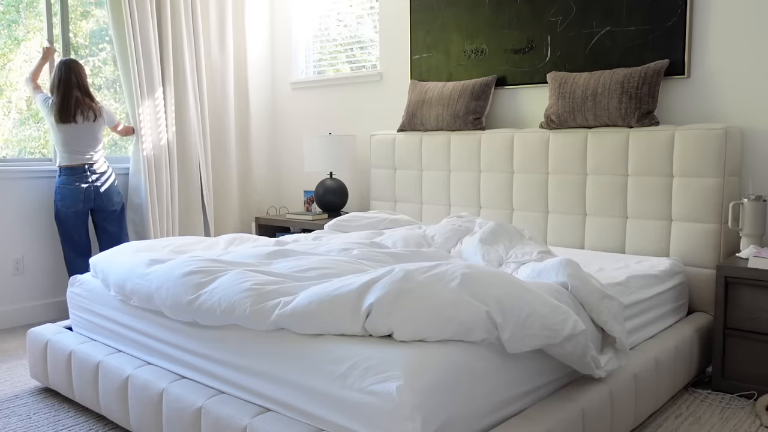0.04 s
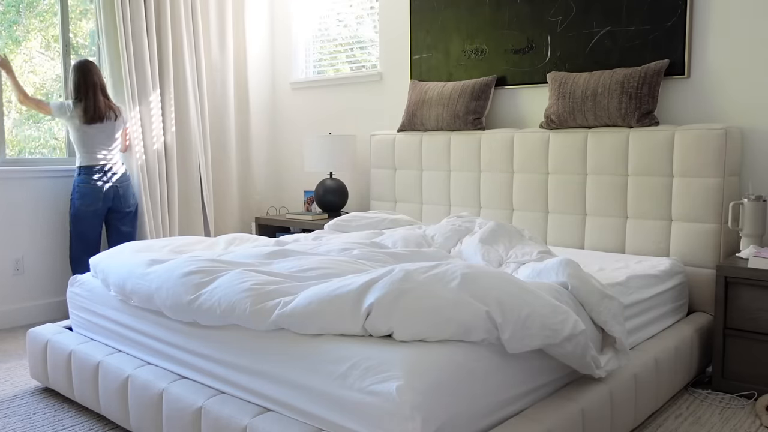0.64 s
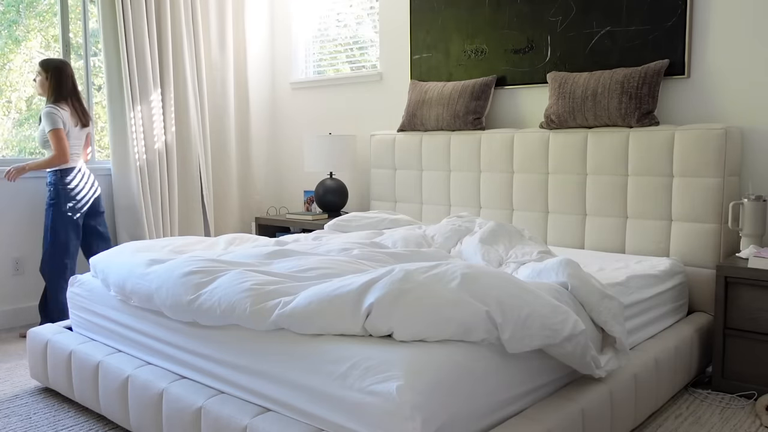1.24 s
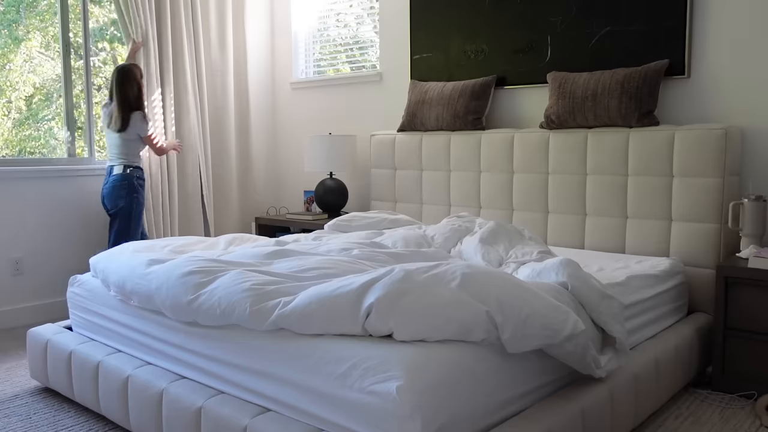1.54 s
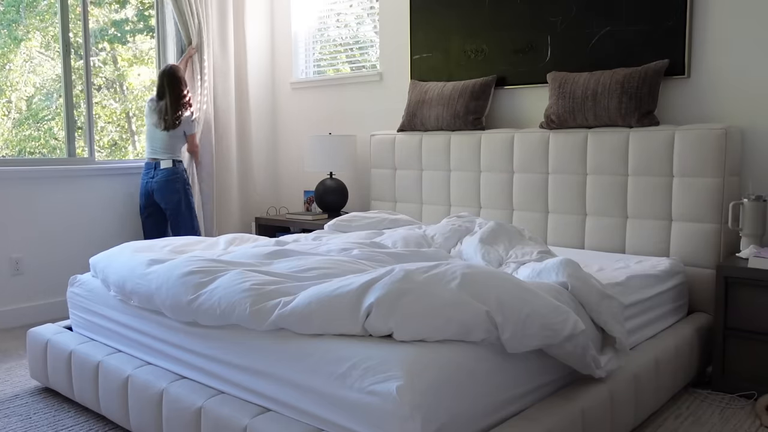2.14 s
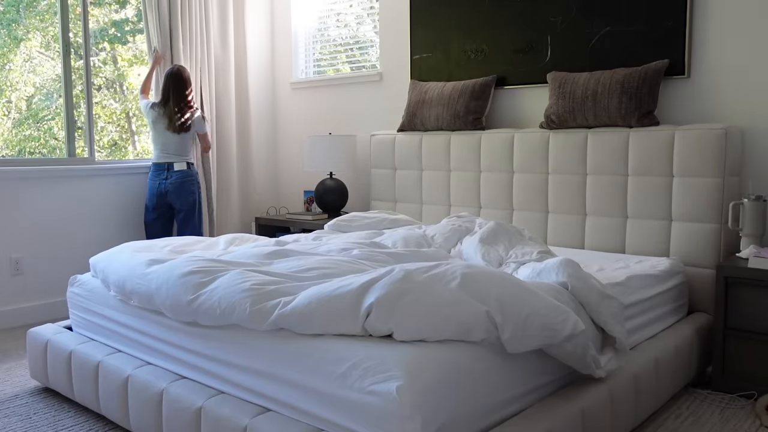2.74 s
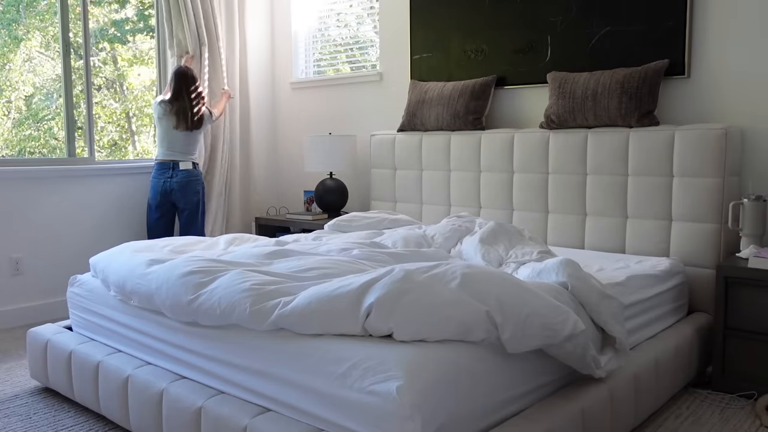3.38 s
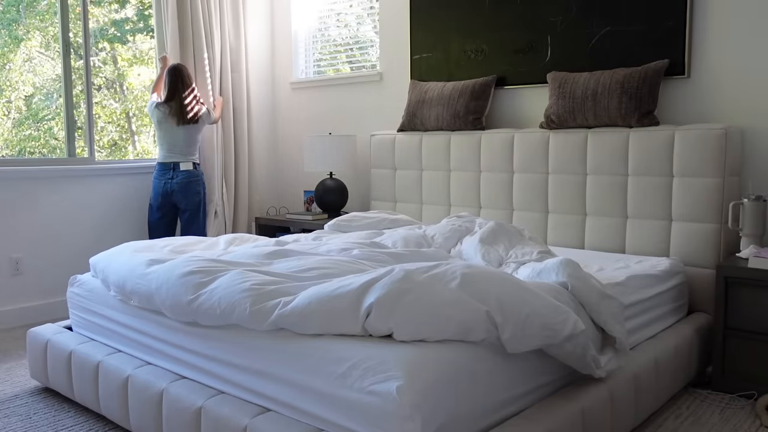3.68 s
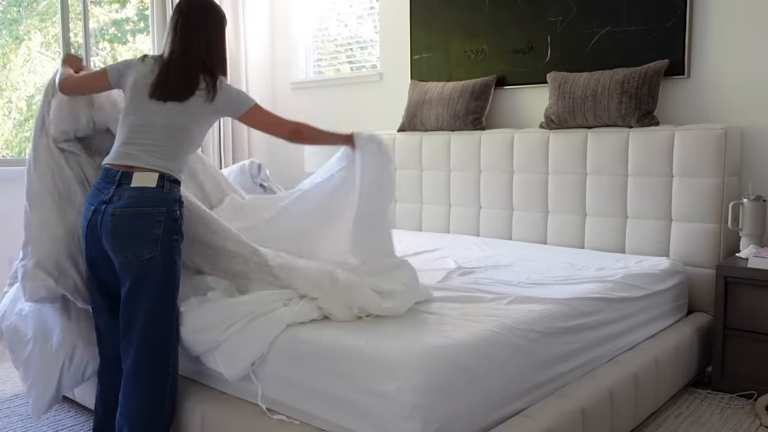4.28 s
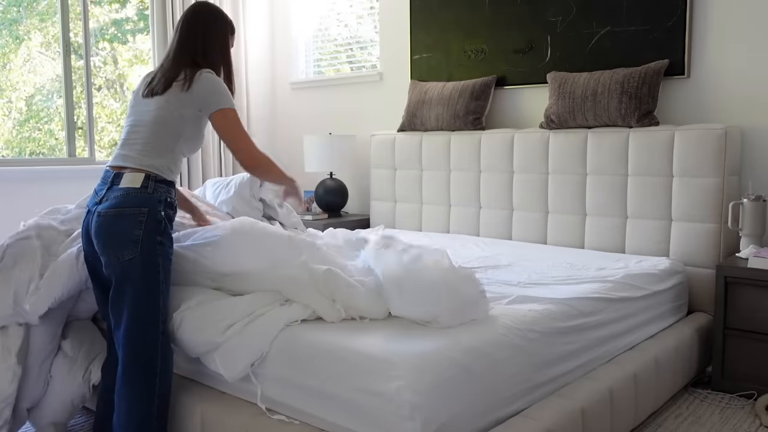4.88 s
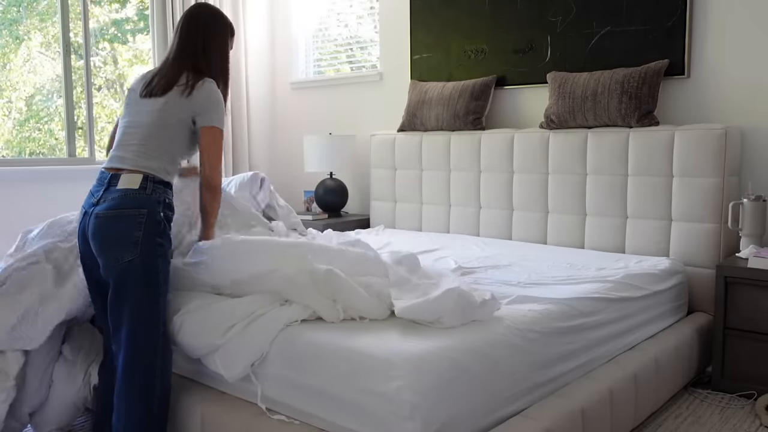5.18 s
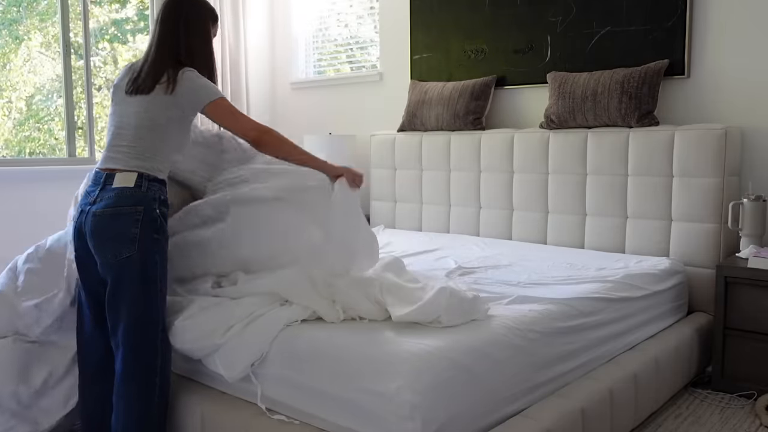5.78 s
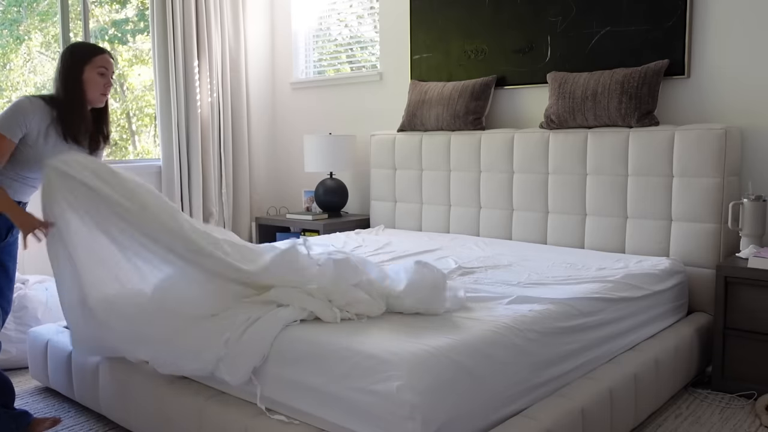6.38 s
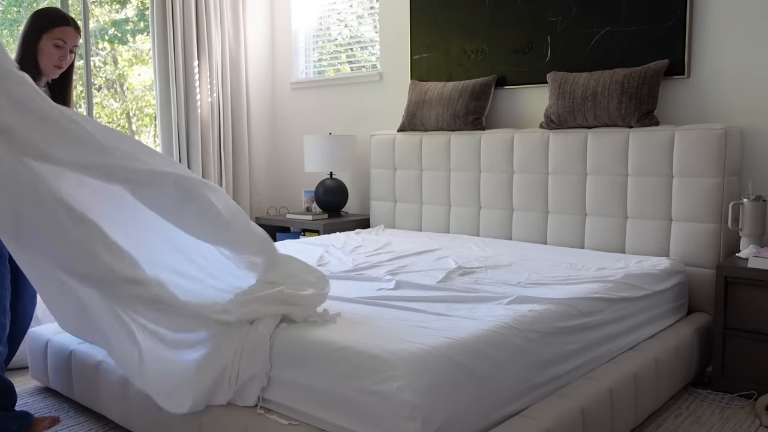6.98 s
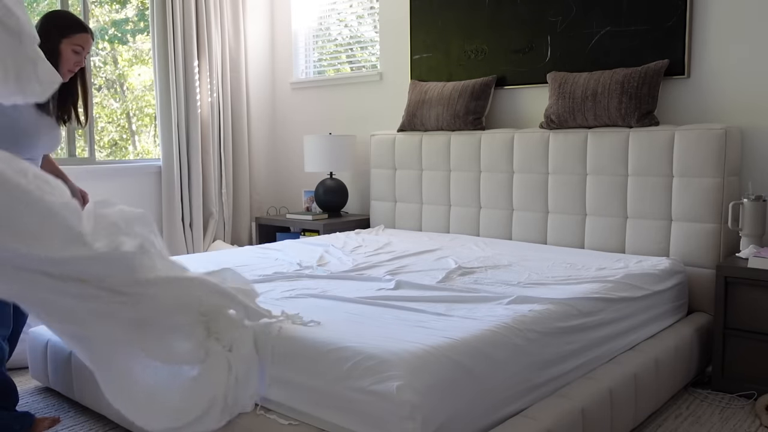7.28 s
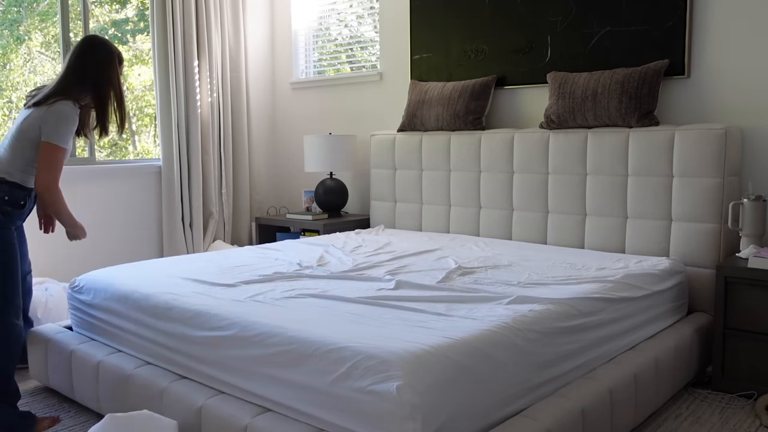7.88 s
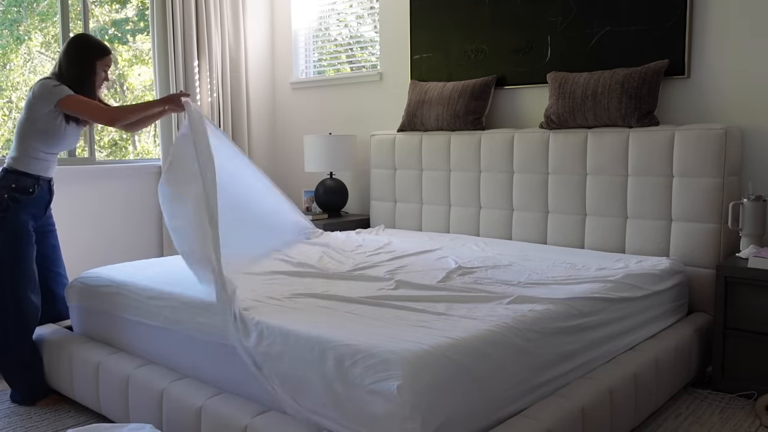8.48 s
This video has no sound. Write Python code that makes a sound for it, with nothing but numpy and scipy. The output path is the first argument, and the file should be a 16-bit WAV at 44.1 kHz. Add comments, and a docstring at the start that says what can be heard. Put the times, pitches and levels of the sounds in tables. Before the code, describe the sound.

Curtains are swished open in a quiet bedroom, followed by bedding being dragged and shaken, over a faint fan hum.

```python
"""Curtains and bedclothes

Two curtains are drawn in a quiet bedroom, their rings chattering along the rod across the room.
Nearer by, a duvet and sheets are dragged off the bed: cotton hisses as it slides, folds buckle
and flap in puffs of air, and the heap lands. A fan hums faintly throughout."""
import sys
import numpy as np
from scipy import signal
from scipy.fft import rfft, irfft, next_fast_len
from scipy.io import wavfile
from scipy.ndimage import map_coordinates

SR = 44100
rng = np.random.default_rng(int(sys.argv[2]) if len(sys.argv) > 2 else 0)


def unload_wav(signal):
    """Save mono or channel-first audio to the path in sys.argv[1] as 16-bit WAV at rate SR, clipped to [-1, 1]."""
    wavfile.write(
        sys.argv[1],
        SR,
        np.round(np.clip(np.atleast_2d(signal).T, -1, 1) * 32767).astype(np.int16),
    )


N = 376173
TIME = np.arange(N) / SR


def amp(db):
    """Decibels to gain."""
    return 10 ** (np.asarray(db) / 20)


def unit_rms(x):
    """Scales to an rms of one."""
    return x / np.sqrt(np.mean(x ** 2) + 1e-20)


def read(curve, hz):
    """Reads a curve on a log-frequency axis."""
    f, value = np.transpose(curve)
    return np.interp(np.log(hz + 1), np.log(f + 1), value)


def add(mix, s, sound):
    """Drops a sound into the mix at s seconds."""
    part = mix[round(s * SR):][:len(sound)]
    part += sound[:len(part)]


def impulse(spectrum, size=4096):
    """The minimum-phase click of unit energy with this spectral shape."""
    hz = abs(np.fft.fftfreq(size, 1 / SR))
    log_gain = np.log(amp(read(spectrum, hz)))
    click = np.fft.ifft(np.exp(np.conj(signal.hilbert(log_gain)))).real
    return click / np.linalg.norm(click)


def ringing(modes):
    """Struck resonances (f/Hz, width/Hz, energy/dB): the narrower, the longer they ring."""
    t = TIME[:SR // 2]
    out = np.zeros(len(t))
    for k, (hz, width, db) in enumerate(modes):
        gain = (-1) ** k * amp(db) * np.sqrt(4 * np.pi * width / SR)
        out += gain * np.exp(-np.pi * width * t) * np.cos(2 * np.pi * hz * t)
    return out


def through(x, response):
    """Passes a sound through a body."""
    return signal.oaconvolve(x, response)[:N]


def eq(x, curve):
    """Zero-phase EQ along a curve (f/Hz, gain/dB)."""
    size = next_fast_len(len(x) + 4096)
    gain = amp(read(curve, np.fft.rfftfreq(size, 1 / SR)))
    return irfft(rfft(x, size) * gain, size)[:len(x)]


def contacts(per_s, spread_db):
    """Random tiny impacts of uneven size and either sign, rms one."""
    size = amp(spread_db * np.minimum(rng.exponential(1, N), 4))
    return unit_rms(size * rng.choice([-1, 1], N) * (rng.random(N) < per_s / SR))


def wobble(hz, depth_db):
    """A factor that wanders around one, at roughly the given rate."""
    count = N // 64
    ratio = np.fft.rfftfreq(count, 64 / SR) / hz
    drift = unit_rms(irfft(rfft(rng.standard_normal(count)) * ratio / (1 + ratio ** 3)))
    return amp(depth_db * np.interp(TIME, np.linspace(0, TIME[-1], len(drift)), drift))


def hits(cues):
    """One impulse for each cue (t/s, level/dB)."""
    out = np.zeros(N)
    for s, db in cues:
        add(out, s, amp([db]))
    return out


def stroke(peak_s, rise_s, fall_s, db, curve=1.66):
    """One movement's swell, 10 dB down at rise_s before and fall_s after; more curve, flatter top."""
    away = np.maximum((peak_s - TIME) / rise_s, (TIME - peak_s) / fall_s)
    return amp(db - 10 * np.minimum(away ** curve, 20))


def strokes(cues):
    """Overlapping movements add in power."""
    return np.sqrt(sum(stroke(*cue) ** 2 for cue in cues))


def puff(hz):
    """Air squeezed out by a fold: a quick push and a longer suction, of unit energy."""
    phase = 2 * np.pi * hz * TIME[:2048]
    push = (1 - phase) * np.exp(-phase)
    return push / np.linalg.norm(push)


def sliding(pressure, cloth):
    """Threads catching on threads: a fine, slightly grainy hiss."""
    threads = contacts(per_s=9000, spread_db=1.5) * wobble(hz=30, depth_db=0.4)
    return through(threads * pressure, impulse(cloth))


# Stereo width of air and reflections: f/Hz, side level/dB
SIDE_EQ = [(60, -26), (150, -21), (300, -16.5), (650, -5.5), (1300, -3.5), (2400, -3.5), (4200, -4),
           (8000, -0.5), (15000, -7.5)]
def side_tone(x):
    """Colours a side signal so the lows stay centred and the highs spread."""
    return eq(x, SIDE_EQ)


# Bed of fan and room air: f/Hz, level/dB
AIR_TONE = [(25, -39.5), (60, -15.5), (120, -5), (170, -3), (245, -2), (340, -2), (450, -11.5),
            (650, -17.5), (1200, -13.5), (1850, -13), (2700, -26), (4500, -28.5), (7500, -36),
            (15500, -41.5)]
# The low notes of the hum: f/Hz, wander scale/Hz, level/dB
FAN_HUM = [(116, 3.2, -7.5), (237.8, 8.3, 1)]
def fan():
    """A steady, wide wash of air over a soft hum that wavers in pitch and level."""
    air, spread = (through(rng.standard_normal(N), impulse(AIR_TONE)) for _ in range(2))
    side = amp(5.5) * side_tone(spread)
    hum = np.zeros(N)
    for hz, wander, db in FAN_HUM:
        pitch = hz + wander * np.log(wobble(hz=17.3, depth_db=4.5))
        hum += amp(db) * np.sin(2 * np.pi * np.cumsum(pitch) / SR)
    hum *= wobble(hz=3.2, depth_db=0.5)
    return amp(-57) * np.array([air + side, air - side]) + amp(-58.5) * hum


# Warm body of the rod under the left curtain: f/Hz, level/dB
LEFT_ROD_TONE = [(35, -18), (70, -8), (150, -1.5), (270, 10), (400, -2), (600, -7), (800, -4), (1200, -8),
                 (1600, -3), (2200, 1), (2900, -8.5), (4800, -9.5), (7000, -17.5), (10000, -24.5),
                 (15000, -48)]
def left_curtain():
    """One slow, even glide: many light contacts between rings and rod."""
    chatter = contacts(per_s=2500, spread_db=1) * wobble(hz=25, depth_db=0.9)
    glide = stroke(peak_s=0.45, rise_s=0.8, fall_s=0.5, db=-47.3, curve=2.57)
    return amp(2.5) * through(chatter * glide, impulse(LEFT_ROD_TONE))


# Cloth snapping taut or landing, and footfalls: t/s, level/dB, f/Hz
FLAP_CUES = [(1.212, -19.5, 200), (1.228, -18.5, 400), (1.301, -17.5, 900), (1.738, -16, 99.2),
             (4.2976, -1, 420), (4.328, -8, 420), (4.366, -16, 600), (4.698, 9.5, 630), (4.741, -15, 450),
             (5.142, -7, 600), (5.365, -7, 110), (5.473, -8, 350), (5.506, 0.5, 700), (6.425, -7.5, 400),
             (6.725, -13.5, 700), (7.786, 6, 180), (7.818, -8, 200)]
# Muffled thump of soft cloth: f/Hz, level/dB
FLAP_TONE = [(30, -42.5), (80, -8.5), (160, 2), (240, 9), (700, -1.5), (1300, -4.5), (2000, -18.5),
             (4000, -19), (12000, -66)]
def flaps():
    """Each flap is one large puff, dulled by the cloth; the deep ones set the room booming briefly."""
    puffs = np.zeros(N)
    for s, db, hz in FLAP_CUES:
        add(puffs, s, amp(db) * puff(hz))
    thump = through(puffs, impulse(FLAP_TONE))
    boom = through(puffs, ringing([(227, 21, 0)]))
    return amp(-17) * thump + amp(-24) * boom


# Midrange voice of the creak: f/Hz, width/Hz, level/dB
CREAK_RING = [(1130, 130, 0), (1560, 100, -1)]
def creak():
    """A short run of slips excites two resonances."""
    swell = stroke(peak_s=1.381, rise_s=0.008, fall_s=0.016, db=-49)
    return through(contacts(per_s=1500, spread_db=-5) * swell, ringing(CREAK_RING))


# Weave skidding over weave: t/s, length/s, f/Hz, level/dB
SWISH_CUES = [(1.407, 0.056, 4600, -60), (4.395, 0.055, 4840, -50.5), (4.726, 0.041, 5150, -52),
              (5.008, 0.064, 4600, -55), (5.501, 0.021, 1540, -42.5), (6.09, .08, 4970, -59.5)]
def swishes():
    """Ridged weave rubs briefly at one speed: a narrow band of hiss."""
    out = np.zeros(N)
    for s, length, hz, db in SWISH_CUES:
        ridge = ringing([(hz, 0.25 * hz, 0)])
        count = round(length * SR)
        band = through(through(rng.standard_normal(count), ridge), ridge)[:count]
        add(out, s, amp(db) * unit_rms(band) * signal.windows.tukey(count, 0.3))
    return out


# Handfuls of curtain: peak t/s, rise/s, fall/s, level/dB
GATHER_CUES = [(1.416, 0.008, 0.22, -62.5), (2.2, 0.36, 0.15, -48), (2.566, 0.11, 0.134, -60),
               (2.764, 0.056, 0.089, -63), (3.275, 0.18, 0.9, -57)]
# Soft hiss of heavy drapes: f/Hz, level/dB
DRAPE_TONE = [(200, -8), (700, -2.5), (1500, -0.5), (2500, -2.5), (4800, -7), (7000, -10.5), (10000, -21),
              (15000, -30)]
def gathering():
    """Hands bunch the curtain, and the cloth rubs over itself."""
    return sliding(strokes(GATHER_CUES), DRAPE_TONE)


# The right curtain's jerks, from first catch to swing-back: peak t/s, rise/s, fall/s, level/dB
PULL_CUES = [ (1.744, 0.0073, 0.013, -29.5), (1.872, 0.096, 0.066, -19.5), (1.965, 0.084, 0.086, -16.5),
             (2.08, 0.073, 0.098, -27), (2.341, 0.02, 0.033, -55.5), (3.375, 0.049, 0.05, -28.5),
             (3.44, 0.043, 0.06, -21.5), (3.505, 0.061, 0.059, -27), (3.8, 0.16, 0.03, -49), ]
# Accents from single rings knocking on the rod: t/s, level/dB
KNOCK_CUES = [(1.739, -7.5), (1.866, 1), (1.964, -10), (1.996, 3), (2.574, -27.5), (2.755, -30),
              (3.298, -25), (3.330, -19), (3.359, -13), (3.436, 1), (3.551, -1.5), (3.678, -19.5),
              (3.804, -14.5), (3.832, -29)]
# Bright scrape of the rod under the right curtain: f/Hz, level/dB
RIGHT_ROD_TONE = [(90, -55), (250, -22.5), (370, -13), (540, -24), (750, -15), (1150, -12.5), (1800, -6),
                  (2250, 2), (2700, -0.5), (3600, -6.5), (5400, -11.5), (8000, -26), (11000, -45.5),
                  (15000, -57.5)]
# Top-end sizzle of fast rings: f/Hz, level/dB
SIZZLE_TONE = [(1000, -49.5), (3500, -3), (6000, 4.5), (8000, -4.5), (11000, -16), (15000, -39)]
# Resonances stirred by rings on the rod: f/Hz, width/Hz, level/dB
ROD_RING = [(245, 10.6, -22.5), (440, 20, -33.5), (818, 20.2, -33.5), (1292, 32, -15.5), (2040, 19, -19),
            (2100, 21.8, -16), (2200, 9.1, -7), (2217, 27.4, -33.5), (2300, 28, -21), (2490, 21, -11),
            (2430, 27, -9.5), (2780, 14, -30.5), (2700, 26, -25), (3540, 27, -16), (4460, 35, -29)]
def right_curtain():
    """Two brisk pulls: the rings scrape, brighter the faster they run, and the rod resonates."""
    speed = strokes(PULL_CUES)
    brightness = np.sqrt(speed / speed.max())
    chatter = unit_rms(contacts(per_s=2400, spread_db=2.5) + amp(-4) * rng.standard_normal(N))
    drive = chatter * speed * wobble(hz=70.5, depth_db=0.5)
    knocks = hits(KNOCK_CUES)
    scrape = through(drive + knocks, impulse(RIGHT_ROD_TONE))
    skips = contacts(per_s=3000, spread_db=3.5)
    sizzle = through(skips * speed * brightness, impulse(SIZZLE_TONE))
    rod = through(drive + amp(2) * knocks, ringing(ROD_RING))
    return amp(-0.5) * scrape + amp(-9) * sizzle + amp(-14.5) * rod


# Rings swinging together: peak t/s, rise/s, fall/s, level/dB
SWING_CUES = [(3.55, 0.14, 0.024, -43), (3.689, 0.022, 0.048, -45.5), (3.808, 0.006, 0.013, -34)]
# Their chime: f/Hz, width/Hz, level/dB
CHIME_RING = [(2210, 70, -5), (2390, 81, -5), (2440, 90, -8)]
def settling():
    """The second pull leaves the rings chiming and briefly sets a low room resonance humming."""
    taps = contacts(per_s=660, spread_db=-4) * strokes(SWING_CUES)
    taps = eq(taps, [(1200, -25), (2150, 0.5), (2550, 1), (3600, -18)])
    swell = stroke(peak_s=3.44, rise_s=0.11, fall_s=0.08, db=-45)
    room_hum = through(contacts(per_s=360, spread_db=-2.5) * swell, ringing([(239.5, 14, 0)]))
    return amp(-2) * through(taps, ringing(CHIME_RING)) + amp(1.5) * room_hum


# The duvet is gripped, thrown aside and dragged off to land; then the sheet is shaken out:
# peak t/s, rise/s, fall/s, billow level/dB, buckle level/dB, slide level/dB
TUG_CUES = [ (3.885, 0.008, 0.21, -54, -50.5, -46.5), (4.097, 0.15, 0.66, -53.5, -55, -52.5),
            (4.315, 0.037, 0.1, -39, -43.5, -59), (4.418, 0.096, 0.1, -47.5, -50, -50),
            (4.534, 0.047, 0.067, -65, -48.5, -54.5), (4.669, 0.081, 0.15, -47.5, -47.5, -52.5),
            (4.74, 0.04, 0.055, -49, -46.5, -47.5), (5.02, 0.27, 0.17, -54.5, -50.5, -54.5),
            (5.157, 0.025, 0.1, -54, -48, -56.5), (5.271, 0.1, 0.3, -47, -48.5, -53),
            (5.481, 0.072, 0.11, -41, -53, -49.5), (5.572, 0.09, 0.085, -43, -46, -48.5),
            (5.671, 0.1, 0.11, -49, -53, -50), (5.89, 0.36, 0.26, -71, -56, -59),
            (6.156, 0.19, 0.38, -49.5, -57.5, -57), (6.33, 0.065, 0.073, -44.5, -48, -53),
            (6.4, 0.095, 0.26, -44.5, -43.5, -48.5), (6.565, 0.03, 0.073, -44.5, -50, -60),
            (6.75, 0.069, 0.14, -49, -52.5, -61.5), (6.94, 0.25, 0.24, -48, -51.5, -53.5),
            (7.4, 0.67, 0.66, -67.5, -69, -64), (7.6, 0.1, 0.06, -44.5, -52, -67),
            (7.675, 0.076, 0.08, -32.5, -43, -62), (7.744, 0.046, 0.09, -27.5, -38, -53),
            (7.955, 0.0089, 0.14, -72, -65, -55.5), (8.13, 0.16, 0.34, -63, -62.5, -50),
            (8.445, 0.074, 0.084, -39, -44, -41.5), ]
# Low whoosh of broad panels: f/Hz, level/dB
BILLOW_TONE = [(25, -52), (60, -21), (90, -5), (125, -0.5), (165, 0.5), (240, 0), (330, 0.5), (500, -10.5),
               (900, -14), (2000, -73)]
# Midrange rumple of folds: f/Hz, level/dB
FOLD_TONE = [(60, -16), (200, -4.5), (400, 2), (650, -0.5), (1200, -0.5), (1800, -4), (2600, -10),
             (5000, -15.5), (12000, -84)]
# Crisp hiss of cotton: f/Hz, level/dB
COTTON_TONE = [(200, -19), (900, -6.5), (1800, 4), (2500, 1.5), (3600, 2.5), (5200, 1), (7000, -3.5),
               (10000, -11), (13000, -18.5), (15500, -26)]
def bedding():
    """Broad panels billow, small folds buckle with puffs of all sizes, and the cotton slides."""
    motion = np.array([stroke(peak_s, rise_s, fall_s, 0) for peak_s, rise_s, fall_s, *_ in TUG_CUES])
    strength = amp([layers_db for _, _, _, *layers_db in TUG_CUES])
    billow, buckle, slide = np.sqrt(strength.T ** 2 @ motion ** 2)  # tugs add in power
    catching = wobble(hz=22, depth_db=0.96)
    panels = through(contacts(per_s=900, spread_db=0.5) * billow * catching, impulse(BILLOW_TONE))
    puffs = sum(through(contacts(per_s=130, spread_db=1), puff(hz))
                for hz in np.geomspace(300, 1500, num=6))
    folds = unit_rms(through(puffs, impulse(FOLD_TONE))) * buckle * catching
    return amp(-3) * panels + amp(1.23) * folds + amp(2.25) * sliding(slide, COTTON_TONE)


# Small clicks in the bedding: t/s, level/dB
TICK_CUES = [(4.991, -15), (5.2905, -7), (5.296, -21), (5.305, -22), (5.315, -25), (5.92, -19),
             (6.816, -19.5)]
# Their hard edge: f/Hz, level/dB
TICK_TONE = [(300, -21), (1200, -2), (1900, 9), (3700, 1.5), (6000, -5.5), (8500, -24), (14000, -38)]
def ticks():
    """Fasteners and stiff seams tick, one sharp impact each."""
    return amp(-5) * through(hits(TICK_CUES), impulse(TICK_TONE))


# The bedroom's short reverb: f/Hz, T60/s
ROOM_DECAY = [(100, 0.18), (500, 0.51), (2500, 0.28), (6000, 0.25), (14000, 0.27)]
def reverb_tail(taps_per_s=4000, predelay_s=0.002):
    """Sparse reflections, each band dying at its own speed."""
    count = SR // 2
    taps = rng.choice([-1., 1.], count) * (rng.random(count) < taps_per_s / SR)
    taps *= TIME[:count] > predelay_s
    hz, t, bands = signal.stft(taps, SR, nperseg=256)
    decay = 10 ** (-3 * t / read(ROOM_DECAY, hz)[:, None])
    tail = signal.istft(bands * decay, SR, nperseg=256)[1][:count]
    return tail / np.linalg.norm(tail)


def room(x, wet_db, echo, width_db, places=6, travel_s=0.04):
    """Direct sound, ceiling echo and stereo tail; the reflections change as the source moves."""
    mid, side = np.zeros((2, N))
    for k in range(places):
        away = (TIME / travel_s - k + places / 2) % places - places / 2
        here = x * np.cos(np.pi / 2 * np.minimum(abs(away), 1))  # cross-fade from place to place
        mid += amp(wet_db) * through(here, reverb_tail())
        side += amp(width_db) * through(here, side_tone(reverb_tail()))
    ceiling_s = 0.0059 * wobble(hz=1.96, depth_db=0.74)
    bounce = eq(x, [(280, -15), (450, -2)])  # only waves above the room's modes echo cleanly
    mid += x + echo * map_coordinates(bounce, [(TIME - ceiling_s) * SR], order=3)
    mid /= np.sqrt(1 + echo ** 2 + amp(wet_db) ** 2)
    return np.array([mid + side, mid - side])


def scene():
    """The window sits across the room, the bed nearer and drier, the fan under it all."""
    window = left_curtain() + right_curtain() + settling() + gathering()
    accents = flaps() + ticks() + creak()
    far = room(window, wet_db=-1, echo=0.12, width_db=-10)
    near = room(bedding() + swishes(), wet_db=-7, echo=0.32, width_db=-7)
    return far + near + room(accents, wet_db=-3, echo=0.88, width_db=-14.5, places=2) + fan()


# Stereo tilt: f/Hz, left over right level/dB
STEREO_TILT = [(600, -0.5), (1300, 1), (2400, 1.7), (4400, 1), (8000, 1.7), (15000, 1)]
def record(dry):
    """Master EQ: a little brighter on the left, then a steep high cut."""
    pair = np.array([eq(x, [(hz, sign * db / 2) for hz, db in STEREO_TILT])
                     for x, sign in zip(dry, (1, -1))])
    high_cut = signal.firwin(511, cutoff=15700, window=("kaiser", 9), fs=SR)
    return signal.oaconvolve(pair, high_cut[None], "same")


dry = scene()
out = record(dry)
unload_wav(out)
```